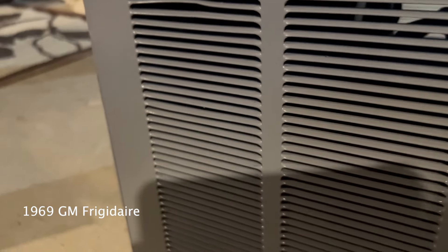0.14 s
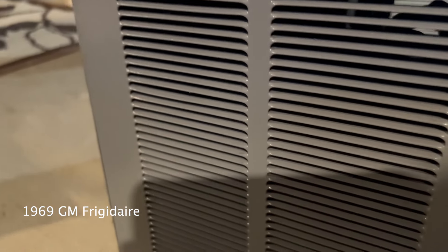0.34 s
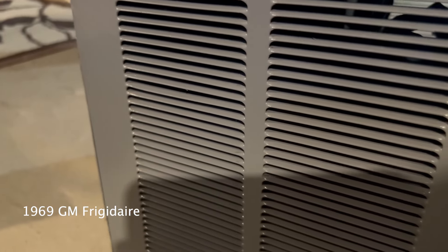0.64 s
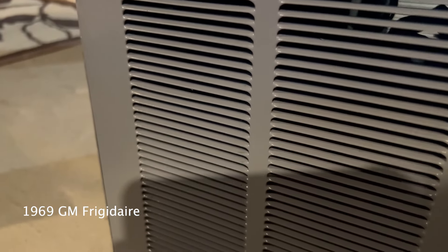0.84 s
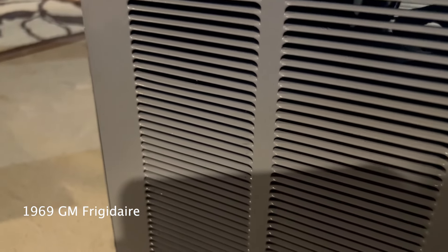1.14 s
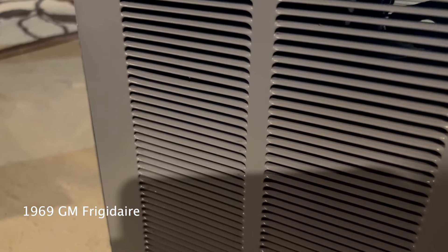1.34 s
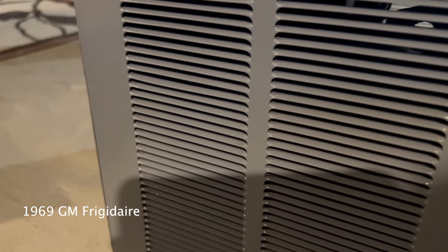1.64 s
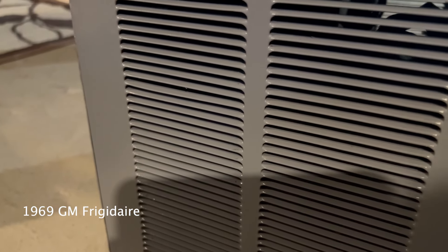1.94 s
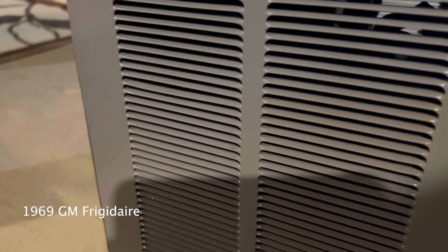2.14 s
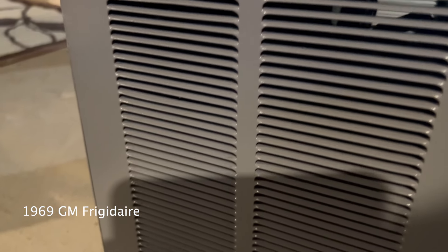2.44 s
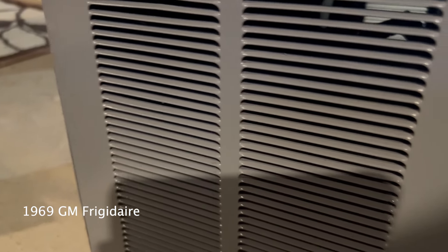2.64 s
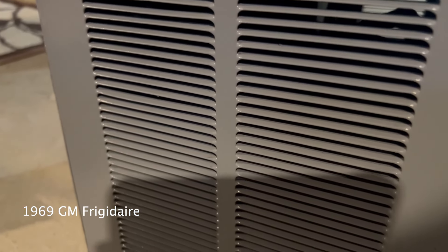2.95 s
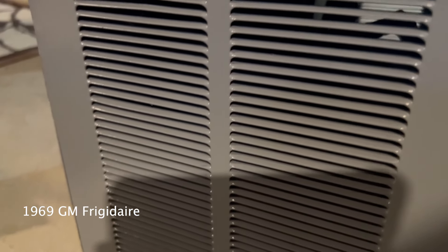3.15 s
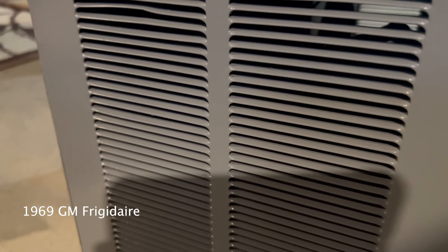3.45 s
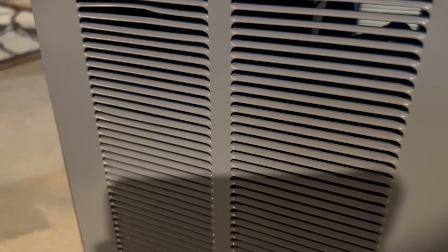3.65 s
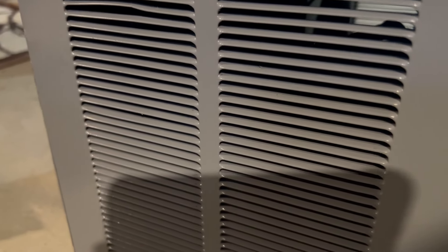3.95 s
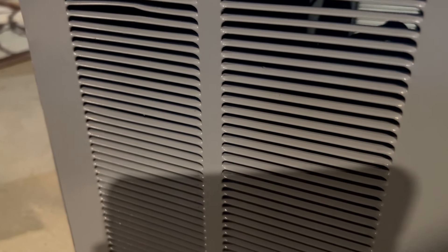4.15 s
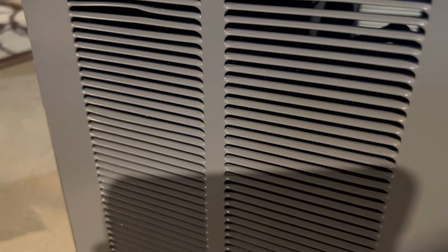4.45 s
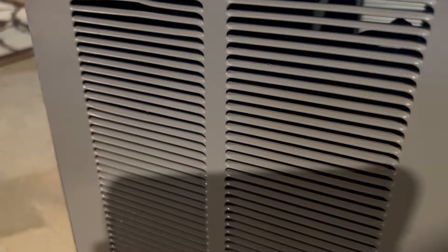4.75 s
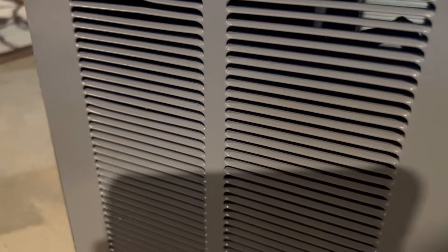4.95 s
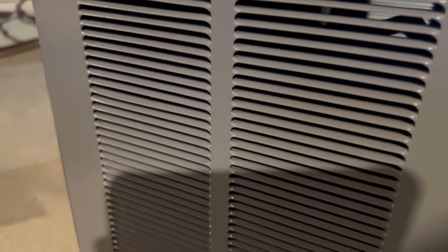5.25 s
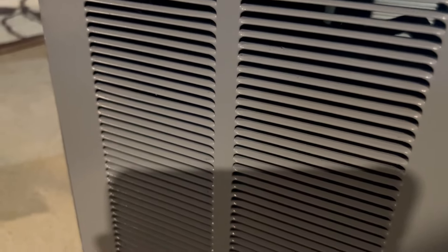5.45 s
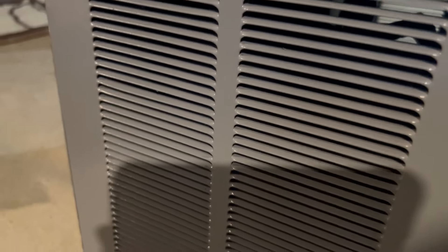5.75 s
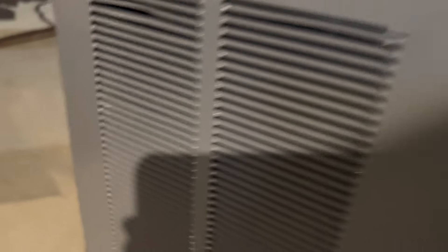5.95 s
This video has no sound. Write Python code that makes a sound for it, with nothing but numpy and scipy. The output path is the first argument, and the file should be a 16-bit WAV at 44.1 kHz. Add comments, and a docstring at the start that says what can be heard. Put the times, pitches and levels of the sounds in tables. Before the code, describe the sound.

Air rushes over a low hum from an old window air conditioner, a switch clacks, then its compressor squeals up into a steady high whine.

```python
"""Air rushes through a grille over a low hum, and grows fuller: an old window air conditioner, heard close by.
A thermostat clicks, the compressor turns over, and a brief rising squeal leads up to a steady high whine.
The air is shaped noise and the hum is sine tones; the click is short noise bursts and ringing metal.
A turning crankshaft gives one click per turn. Each click snaps a valve, lets out a puff of gas,
slaps a reed and makes the gas cavity, the shell and the pipes ring."""
import sys
import numpy as np
from scipy import signal
from scipy.fft import rfft, irfft, next_fast_len
from scipy.io import wavfile
from scipy.ndimage import uniform_filter1d

SR = 44100
rng = np.random.default_rng(int(sys.argv[2]) if len(sys.argv) > 2 else 0)


def materialize(psi):
    """Save the field psi as 16-bit PCM at rate SR to the path in sys.argv[1].

    A 1-D psi becomes a single channel; in a 2-D psi each row is a channel.
    """
    bounded = np.clip(np.atleast_2d(psi).T, -1, 1)
    quanta = np.round(bounded * 32767).astype(np.int16)
    wavfile.write(sys.argv[1], SR, quanta)


N = 268877
TIME = np.arange(N) / SR  # seconds

# Tone colours of noise: only their shape matters, as the noise is scaled to one loudness.
# Air through the grille, with the fan slow and at full speed. Each row: pitch in Hz, level in dB per Hz.
SLOW_AIR_COLOUR = [(15, -82), (25, -45), (43, -12.5), (117, -4.5), (326, -13.5), (476, -15.5), (516, -13.5),
                   (591, -32), (775, -17), (1440, -30.5), (2160, -32.5), (2760, -37.5), (8140, -53.5),
                   (10100, -60.5), (16000, -68)]
FULL_AIR_COLOUR = [(25, -32), (42, -11.5), (58, -5.5), (90, 2), (112, -4.5), (135, -8), (200, -8),
                   (300, -12.5), (520, -13), (680, -16), (1000, -18.5), (1400, -26.5), (2000, -30),
                   (2400, -31.5), (4000, -72)]
# Rumble of the cabinet. Each row: multiple of the shudder's pitch, level in dB per Hz.
CABINET_COLOUR = [(0.37, -47), (0.62, -13), (1, 7), (1.4, -2), (1.75, -13), (2.5, -19.5), (3.75, -51),
                  (12, -74)]
# Snap of the thermostat. Each row: pitch in Hz, level in dB per Hz.
SNAP_COLOUR = [(200, 6), (550, 9), (900, -1), (1500, 14.5), (2300, 1), (3600, -11), (5500, -2), (7000, -7),
               (9500, 7), (12000, -7), (16000, -12)]
# Valve and gas of each stroke. Each row: pitch in Hz, level in dB per Hz.
GAS_COLOUR = [(600, -10.5), (1500, 6.5), (2050, -13), (2900, 1.5), (3500, -2), (3950, -9.5), (4400, 4.5),
              (4900, -0.5), (5500, 1.5), (6200, 0), (7200, 1), (8600, 8), (9300, 2.5), (9900, -10.5),
              (12800, 6), (16000, -1.5)]
# Reed slapping its seat. Each row: pitch in Hz, level in dB per Hz.
REED_COLOUR = [(8000, -52), (11000, -3), (12800, -5.5), (13600, -1), (14800, -8), (16000, 3)]
# Dry tick of each knock. Each row: pitch in Hz, level in dB per Hz.
TICK_COLOUR = [(700, -12), (1600, 3), (2200, -3), (2850, 9), (3600, -9), (5000, -10), (9000, -15),
               (16000, -7)]

# Tones of the fan wheel and motor. Each row: pitch in Hz, level at low speed in dB,
# level at full speed in dB, waver from 0 to 1.
HUM_TONES = [(87.4, -41, -44, 0), (104.95, -41.5, -38, 0.05), (118.2, -36, -42.5, 0.33)]
# Shudders of the cabinet as the fan runs up, as the compressor kicks in and as it settles on its springs.
# Each row: start in seconds, rise time in seconds, peak level in dB, pitch in Hz.
SHUDDER_EVENTS = [(0.4, 0.19, -35.5, 88), (1.49, 0.08, -30.5, 110), (1.62, 0.15, -31.5, 87),
                  (2.14, 0.18, -32, 77), (5.55, 0.17, -37.5, 86)]
# Bounces of the closing contact. Each row: delay after the switch time in seconds, strength in dB.
CONTACT_BOUNCES = [(0.0035, 0), (0.011, -6), (0.023, -22)]
# Ringing of the panel that holds the thermostat.
# Each row: pitch in Hz, level in dB, seconds to fall by 60 dB.
PANEL_RINGS = [(221, -24, 0.2), (298, -35, 0.1), (387, -30, 0.086), (1380, -28.5, 0.09), (1630, -36, 0.1),
               (2078, -39.5, 0.17), (2340, -49, 0.13), (2850, -53, .12), (4730, -53, 0.12),
               (5170, -51.5, 0.1), (5830, -48.5, 0.11)]

# Weaker rings of the pipes and casing. Each row: pitch in Hz, width in Hz, level in dB,
# pan in dB (added on the left, taken off on the right).
PIPE_RINGS = [(57, 12, -48, 5), (359, 28, -63, 10.5), (433, 160, -51.5, -9), (943, 14, -54, 5.5),
              (1133, 63, -59, 6.5), (1270, 75, -67, 2), (1404, 18, -57.5, 0), (1524, 7.3, -60.5, -7.5),
              (1808, 16, -54, -0.5), (7000, 67, -60, 8.5)]
# Rings of the casing, each swelling once as the microphone drifts across the grille.
# Each row: pitch in Hz, width in Hz, pan in dB, level outside the swell in dB,
# top of the swell in seconds, its half-length in seconds, its height in dB.
CASING_SWELLS = [(586.4, 8.1, 0, -55.5, 3.4, 3.6, 7), (3228, 12, -1, -71.5, 1.9, 0.5, 22),
                 (1524, 160, -2, -61, 1.46, 0.59, 11), (2757, 37, 2.5, -60.5, 2.5, 0.82, 11),
                 (2796, 26, 7, -59, 5.6, 0.98, 2.5), (1783, 81, 5, -71, 1.5, 0.34, 11),
                 (3600, 450, -1, -73.5, 1.65, 0.81, 22.5), (4350, 130, 6.5, -72, 5.7, 2.1, 9),
                 (4540, 21, 2.5, -63, 3.44, 0.41, 14), (5180, 110, 6.5, -64, 1.66, 0.38, 7),
                 (5310, 98, 7.5, -65.5, 5.1, 1.4, 10), (5550, 34, 10, -61.5, 6, 0.51, 1),
                 (5600, 250, 7, -72, 2, 0.9, 17), (6910, 29, -1, -64, 4.64, 0.28, 14.5),
                 (7020, 24, -5, -65.5, 3.9, 0.51, 4), (7380, 20, 7, -62, 2, 0.96, 6),
                 (7820, 18, 3, -68.5, 2.9, 0.55, 16.5), (8320, 98, 1, -57.5, 5.5, 0.96, 14),
                 (8400, 93, 3, -59.5, 3.65, 0.62, 10), (11180, 390, 0.5, -48, 3.05, 0.36, 4),
                 (13270, 73, 0, -59.5, 3.15, 0.5, 13.5), (14500, 600, 4, -66.5, 1.6, 0.7, 17)]
# Overall level of the reed's slap. Each row: time in seconds, level in dB before the slap's own changes.
SLAP_LEVEL = [(1.5, -42), (2.37, -43), (2.87, -38), (4.65, -42.5), (5.57, -39), (6.05, -54)]
# Knocks as the compressor rocks on its mounts in the first turns. Each row: time in seconds, strength in dB.
MOUNT_KNOCKS = [(1.275, -45), (1.353, -43), (1.399, -42)]
# Ringing of the mounts. Each row: pitch in Hz, level in dB, seconds to fall by 60 dB.
MOUNT_RINGS = [(1870, -8, 0.08), (2810, -4, 0.12), (2920, -9, 0.07), (4620, -11, 0.07), (5930, -12, 0.08),
               (8760, -12, 0.079)]
# Swells of the squeal as it sweeps through the mounts' resonances. Each row: pitch in Hz, change in dB.
SQUEAL_SWELL = [(1200, -50), (1550, -16), (1800, -4), (2100, -9), (2500, -6.5), (2780, 0), (3000, -10),
                (3500, -50)]
# Level of the gas cavity's ring. Each row: time in seconds, level in dB.
CAVITY_RING_LEVEL = [(1.33, -70), (1.37, -56), (1.42, -48), (1.5, -45.5), (1.63, -39), (2.2, -42.5),
                     (3.0, -39.5), (3.55, -44.5), (3.9, -44), (4.3, -39), (5.75, -40), (6.1, -45.5)]
# Level of the shell's ring. Each row: time in seconds, level in dB before SHELL_TRIM_DB.
SHELL_RING_LEVEL = [(1.33, -74), (1.37, -46), (1.53, -44), (1.85, -47), (2.62, -42.5), (2.83, -45.5),
                    (3.48, -39.5), (3.77, -45), (6.1, -48.5)]

# How alike noise is on the left and right. Each row: pitch in Hz, likeness from 0 to 1.
SIDE_LIKENESS = [(60, 1), (140, 1), (300, 0.99), (520, 0.82), (800, 0.2), (1700, 0.3), (3000, 0.38),
                 (5500, 0.12), (7500, 0.92), (10000, 1)]
# How far the left is set ahead of the right. Each row: pitch in Hz, lead in radians.
LEFT_LEAD = [(0, 0), (1700, -.1), (3300, 1.4), (4500, .8), (5400, 1), (6300, 0), (7300, -.2), (8400, -1.3),
             (10000, -3.14), (13300, -6.28), (14300, -6.6), (16000, -8.8)]

# The fan speeds up along an S-curve: half-way time and time constant.
FAN_HALF_S, FAN_RISE_S = 1.44, 0.69
# The air starts a little weak (LACK) and fills in.
SLOW_AIR_DB, FULL_AIR_DB, DRAUGHT_LACK_DB, DRAUGHT_S = -31, -32.5, 3.5, 0.17
# T60 is the time a sound takes to fall by 60 dB.
SWITCH_S, SWITCH_DB, SWITCH_T60_S = 1.1402, -32, 0.088
# The crankshaft's speed grows by a factor e every RUN_UP_S until the motor holds it;
# rising pressure then slows it a little.
FIRST_STROKE_S, START_TURNS_PER_S, RUN_UP_S = 1.2745, 8.45, 0.1
FULL_TURNS_PER_S, SAG_TURNS_PER_S2 = 58.68, 0.068
FORCE_POWER = 0.78  # a stroke's force goes with this power of the speed
VALVE_DB, PUFF_DB, ROOM_T60_S = -46, -40.5, 0.4
REED_S = 0.0024  # time constant of each slap
# Each knock chatters briefly: average contacts per second, and time to die away.
CHATTER_PER_S, CHATTER_S = 640, 0.016
TICK_DB, TICK_T60_S = -4.5, 0.14  # tick level is relative to its knock
# The rotor's slots sing; SLOT_DB is the level before the squeal's swells.
SLOTS_PER_TURN, SLOT_DB = 70, -43.5
# Both rings start sharp by EXCESS and settle with the time constant PRESSURE_S.
CAVITY_HZ, CAVITY_EXCESS_HZ, SHELL_HZ, SHELL_EXCESS_HZ, PRESSURE_S = 3211, 102, 1461, 30, 1.25
# Gas pressure pulses with each stroke and bends each ring; the cavity feels it part of a turn later.
CAVITY_SWING_HZ, SHELL_SWING_HZ, CAVITY_LAG_TURNS = 38, 21, 0.44
CAVITY_WIDTH_HZ, SHELL_WIDTH_HZ = 9.4, 11
CAVITY_PAN_DB, SHELL_PAN_DB, SHELL_TRIM_DB = 2.5, -2.5, -0.9
CUTOFF_HZ = 15750  # nearly nothing is left above this pitch


def from_db(db):
    """Turn decibels into a gain."""
    return np.exp(np.asarray(db) * (np.log(10) / 20))


def rms_one(x):
    """Scale to an rms (average strength) of 1."""
    return x / np.sqrt(np.mean(x ** 2) + 1e-20)


def since(start_s):
    """Seconds gone by since a moment, zero before it."""
    return np.maximum(TIME - start_s, 0)


def over_time(rows):
    """Join the points of a level curve with straight lines, sample by sample."""
    seconds, level = np.transpose(rows)
    return np.interp(TIME, seconds, level)


def at_hz(points, hz):
    """Read a curve over pitch, with pitch on a log axis."""
    knots, values = np.transpose(points)
    return np.interp(np.log(np.maximum(hz, 1)), np.log(knots), values)


def panned(x, pan_db):
    """Raise the left and lower the right by the same number of dB."""
    return x * from_db([[pan_db], [-pan_db]])


def later(x, delay_s):
    """Delay by a travel time, which may change as it goes."""
    return np.interp(TIME - delay_s, TIME, x, left=0)


def drift(rate_hz):
    """Random wandering of rms 1, weaker above the given rate."""
    hz = np.fft.rfftfreq(N, 1 / SR)[:N // 128]
    spectrum = rfft(rng.standard_normal(2 * len(hz)))[:-1]
    slow = rms_one(irfft(spectrum / (1 + (hz / rate_hz) ** 2)))
    return np.interp(TIME, np.linspace(0, N / SR, len(slow)), slow)


def noise(colour, size=N):
    """Coloured stereo noise of rms 1: a shared part and an opposed part set how alike the sides are."""
    length = next_fast_len(size, True)
    hz = np.fft.rfftfreq(length, 1 / SR)
    mid, side = rfft(rng.standard_normal((2, length))) * from_db(at_hz(colour, hz))
    alike = at_hz(SIDE_LIKENESS, hz)
    both = np.sqrt(1 + alike) * mid + np.sqrt(1 - alike) * side * [[1], [-1]]
    return rms_one(irfft(both, length)[:, :size])


def burst(colour, t60_s, crack, crack_s):
    """Noise with a sharp crack on top of dense, dying reflections."""
    t = TIME[:SR // 2]
    fade = from_db(-60 * t / t60_s) + crack * np.exp(-t / crack_s)
    return noise(colour, size=len(t)) * fade


def played(clicks, response):
    """Let every click set off the response."""
    return signal.fftconvolve(clicks[None], np.atleast_2d(response))[:, :N]


def ring(clicks, hz, width_hz):
    """A resonance whose pitch may glide; a click of height 1 makes it ring with height 1."""
    spin = np.exp(2j * np.pi * np.cumsum(hz * np.ones(N)) / SR)
    keep = np.exp(-np.pi * width_hz / SR)  # share of the ring left after one sample
    swell = signal.lfilter([1], [1, -keep], clicks / spin + 1e-18)
    return (spin * swell).imag


def struck(clicks, modes, lag_s):
    """Each mode (natural ring) of a part takes up the blow a moment later and rings out."""
    out = 0
    for hz, db, t60_s in modes:
        mode = from_db(db) * ring(clicks, hz, np.log(1000) / (np.pi * t60_s))
        out = out + later(mode, lag_s * (0.5 + rng.random()))
    return out


def scattered(x, echo=0.53, path_s=0.0047):
    """Reflections inside the cabinet smear each pulse in time without changing its colour."""
    length = next_fast_len(N + SR // 4, True)
    spectrum, hz = rfft(x, length), np.fft.rfftfreq(length, 1 / SR)
    for delay_s in path_s * np.geomspace(0.5, 2, 3):
        trip = np.exp(-2j * np.pi * hz * delay_s)
        spectrum = spectrum * (trip - echo) / (1 - echo * trip)  # all-pass echo
    return irfft(spectrum, length)[..., :N]


def fan(waver_hz=10.0):
    """Air rushes through the grille; wheel and motor drone, unsteady in the turbulence."""
    full = 1 / (1 + np.exp((FAN_HALF_S - TIME) / FAN_RISE_S))  # from low (0) to full speed (1)
    slow_air = from_db(SLOW_AIR_DB) * np.sqrt(1 - full) * noise(SLOW_AIR_COLOUR)
    full_air = from_db(FULL_AIR_DB) * np.sqrt(full) * noise(FULL_AIR_COLOUR)
    out = from_db(-DRAUGHT_LACK_DB * np.exp(-TIME / DRAUGHT_S)) * (slow_air + full_air)
    for hz, slow_db, full_db, waver in HUM_TONES:
        unrest = 1 + waver * (drift(waver_hz) + 1j * drift(waver_hz))  # in strength and phase
        tone = unrest * np.exp(2j * np.pi * (hz * TIME + rng.random()))
        out = out + from_db(slow_db + full * (full_db - slow_db)) * rms_one(tone.real)
    return out


def shudder():
    """Each jolt sets the cabinet rumbling; the rumble builds up and dies away."""
    out = 0
    for start_s, rise_s, db, hz in SHUDDER_EVENTS:
        age = since(start_s) / rise_s
        swell = (age * np.exp(1 - age)) ** 2  # reaches 1 after the rise time
        out = out + from_db(db) * swell * noise(np.array(CABINET_COLOUR) * [hz, 1])
    return out


def thermostat(crack=0.27, tail_db=-13, tail_t60_s=0.24):
    """The contact snaps shut, bounces and rings the panel; the clack spreads through cabinet and room."""
    clicks = np.zeros(N)
    for after_s, db in [(0.0003, 0)] + CONTACT_BOUNCES:
        clicks[round((SWITCH_S + after_s) * SR)] += from_db(db)
    snap = burst(SNAP_COLOUR, SWITCH_T60_S, crack, crack_s=0.0022)
    tail = from_db(tail_db) * burst(SNAP_COLOUR, tail_t60_s, crack=0, crack_s=1)
    clack = from_db(SWITCH_DB) * played(clicks, snap + tail)
    return clack + struck(clicks, PANEL_RINGS, lag_s=0.0045)


def crank_speed():
    """Turns per second: a quick run-up, then a slow sag under load."""
    t = since(FIRST_STROKE_S)
    run_up = START_TURNS_PER_S * np.exp(t / RUN_UP_S)
    return np.minimum(run_up, FULL_TURNS_PER_S - SAG_TURNS_PER_S2 * t)


def crank_turns():
    """Turns made since the first stroke: the speed added up."""
    return np.cumsum(crank_speed() * (TIME >= FIRST_STROKE_S)) / SR


def force():
    """The faster the crankshaft, the harder the strokes; 1 at full speed."""
    return (crank_speed() / FULL_TURNS_PER_S) ** FORCE_POWER


def strokes():
    """One click for each turn of the crankshaft, as strong as the stroke."""
    speed, turns = crank_speed(), crank_turns()
    # the count steps up over one sample's worth of turning, so each click keeps its exact timing
    steps = np.floor(turns) + np.minimum(turns % 1 * SR / speed, 1)
    return np.diff(steps, prepend=0) * force()


def valve(clicks, wander=0.7, wander_hz=0.7):
    """The valve's buzz repeats stroke after stroke; a drifting blend of two bursts changes its grain."""
    blend = wander * drift(wander_hz)
    buzz = 0
    for share in (np.cos(blend), np.sin(blend)):
        snap = burst(GAS_COLOUR, ROOM_T60_S, crack=0.13, crack_s=0.001)
        buzz = buzz + played(clicks * share, snap)
    return from_db(VALVE_DB) * rms_one(buzz)


def puffs(clicks, jet=1.9, jet_s=0.014):
    """Each stroke releases a fresh puff of hiss that lingers in the cabinet and room."""
    t = TIME[:SR // 2]
    fade = from_db(-60 * t / ROOM_T60_S) ** 2 + jet * np.exp(-t / jet_s)  # power, not height
    power = np.abs(played(clicks, fade)) * force()
    return from_db(PUFF_DB) * rms_one(np.sqrt(power) * noise(GAS_COLOUR))


def shifting(x, echo=0.2, path_s=0.0016, sway_s=0.00005, sway_hz=0.44):
    """A grille reflection changes its path as the microphone sways, so peaks and dips wander in the hiss."""
    reflection = np.array([later(side, path_s + sway_s * drift(sway_hz)) for side in x])
    return (x + echo * reflection) / np.hypot(1, echo)


def pipework(clicks, waver_db=1, waver_hz=2.8, travel_s=0.015, uneven=0.41, wander_hz=7):
    """Strokes travel along the pipes and ring each part at its own moment and strength; pitches waver."""
    parts = [(hz, width_hz, pan_db, db) for hz, width_hz, db, pan_db in PIPE_RINGS]
    for hz, width_hz, pan_db, db, top_s, half_s, swell_db in CASING_SWELLS:
        swell = swell_db * np.exp(-((TIME - top_s) / half_s) ** 2)
        parts.append((hz, width_hz, pan_db, db + swell))
    out = np.zeros((2, N))
    for hz, width_hz, pan_db, db in parts:
        blows = later(clicks, travel_s * rng.random())
        blows = blows * (1 + uneven * drift(FULL_TURNS_PER_S / 2))
        pitch_hz = hz + wander_hz * hz / CAVITY_HZ * drift(waver_hz)  # higher rings wander more
        tone = rms_one(ring(blows, pitch_hz, width_hz))
        out += panned(from_db(db + waver_db * drift(waver_hz)) * tone, pan_db)
    return out


def reed(clicks, fresh=0.97):
    """A short, very high slap on every stroke: partly the same each time, partly fresh hiss."""
    decay = np.exp(-TIME[:SR // 50] / REED_S)
    repeating = rms_one(played(clicks, decay * noise(REED_COLOUR, size=len(decay))))
    hiss = rms_one(played(clicks, decay) * noise(REED_COLOUR))
    return from_db(over_time(SLAP_LEVEL)) * rms_one(repeating + fresh * hiss)


def mounts(chatter=0.54, crack=0.4):
    """A few light, chattering metallic knocks as the compressor lurches into motion."""
    blows, rattle = np.zeros((2, N))
    contacts = chatter * rng.standard_normal(N) * (rng.random(N) < CHATTER_PER_S / SR)
    for knock_s, db in MOUNT_KNOCKS:
        rattle += from_db(db) * contacts * (TIME > knock_s) * np.exp(-since(knock_s) / CHATTER_S)
        blows[round(knock_s * SR)] = from_db(db)
    tick = burst(TICK_COLOUR, TICK_T60_S, crack, crack_s=0.002)
    ticks = from_db(TICK_DB) * played(blows, tick)
    return struck(blows + rattle, MOUNT_RINGS, lag_s=0.00085) + ticks


def steady(x, window_s=0.03):
    """Even out the loudness of a ring, so that a curve can set it."""
    power = uniform_filter1d(x ** 2, int(window_s * SR))
    return x / np.sqrt(np.abs(power) + np.mean(x ** 2) / 100)


def unsteady(tone, flutter=0.1, flutter_hz=7, rough=0.097, jitter_s=0.000008):
    """No two strokes are alike: a ring flutters in strength and wavers a little in pitch."""
    strength = 1 + flutter * drift(flutter_hz) + rough * drift(FULL_TURNS_PER_S)
    return later(tone, jitter_s * drift(flutter_hz)) * strength


def whine(clicks, cavity_lag_s=0.004, shell_lag_s=0.001002):
    """Stroke overtones stand out where cavity and shell resonate; pressure pulses bend them into a buzz."""
    slack = np.exp(-since(FIRST_STROKE_S) / PRESSURE_S)  # 1 at first, dying away
    turns = crank_turns()
    cavity_pulse = (1 - slack) * np.cos(2 * np.pi * (turns - CAVITY_LAG_TURNS))
    shell_pulse = np.cos(2 * np.pi * turns)
    cavity_hz = CAVITY_HZ + CAVITY_EXCESS_HZ * slack + CAVITY_SWING_HZ * cavity_pulse
    shell_hz = SHELL_HZ + SHELL_EXCESS_HZ * slack + SHELL_SWING_HZ * shell_pulse
    cavity_db = over_time(CAVITY_RING_LEVEL)
    shell_db = over_time(SHELL_RING_LEVEL) + SHELL_TRIM_DB
    parts = [(cavity_hz, CAVITY_WIDTH_HZ, cavity_lag_s, cavity_db, CAVITY_PAN_DB),
             (shell_hz, SHELL_WIDTH_HZ, shell_lag_s, shell_db, SHELL_PAN_DB)]
    out = 0
    for hz, width_hz, lag_s, db, pan_db in parts:
        tone = later(ring(clicks, hz, width_hz), lag_s)
        out = out + panned(from_db(db) * unsteady(steady(tone)), pan_db)
    return out


def rotor():
    """A brief rising squeal that follows the crankshaft and fades as the motor reaches speed."""
    hz = SLOTS_PER_TURN * crank_speed()
    tone = np.sqrt(2) * np.sin(2 * np.pi * np.cumsum(hz) / SR)
    flutter = 1 + 0.45 * drift(80)
    level = from_db(SLOT_DB + at_hz(SQUEAL_SWELL, hz)) * (TIME > FIRST_STROKE_S)
    return level * flutter * tone


def scene():
    """Fan, cabinet, switch and compressor together."""
    clicks = strokes()
    gas = shifting(valve(clicks) + puffs(clicks))
    rings = scattered(pipework(clicks)) + whine(clicks)
    compressor = gas + rings + reed(clicks) + mounts()
    squeal = scattered(rotor(), path_s=0.0021)
    return fan() + shudder() + thermostat() + compressor + squeal


def record(dry):
    """Left and right treble are set out of step by an amount that changes with pitch; bass and top are cut."""
    length = next_fast_len(N + SR // 10, True)
    lead = np.interp(np.fft.rfftfreq(length, 1 / SR), *np.transpose(LEFT_LEAD))
    right = irfft(rfft(dry[1], length) * np.exp(-1j * lead), length)[:N]
    bass_cut = signal.butter(2, 22, "high", fs=SR, output="sos")  # below 22 Hz
    top_cut = signal.ellip(12, 0.1, 90, CUTOFF_HZ, fs=SR, output="sos")
    stereo = signal.sosfilt(bass_cut, [dry[0], right])
    return signal.sosfilt(top_cut, stereo)


dry = scene()
out = record(dry)
materialize(out)
```